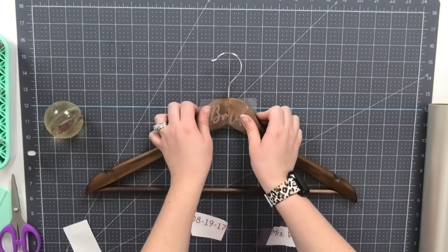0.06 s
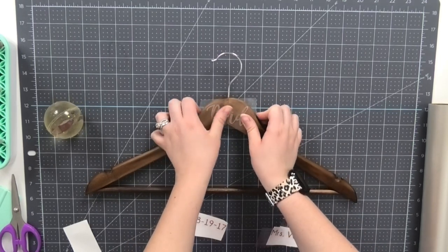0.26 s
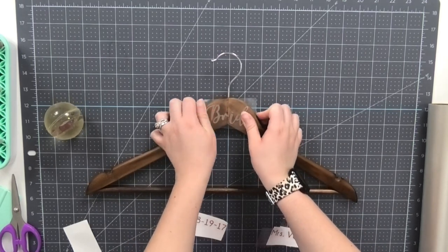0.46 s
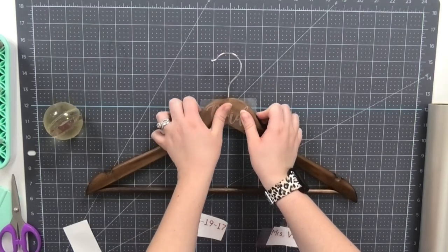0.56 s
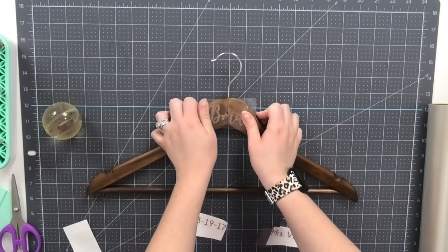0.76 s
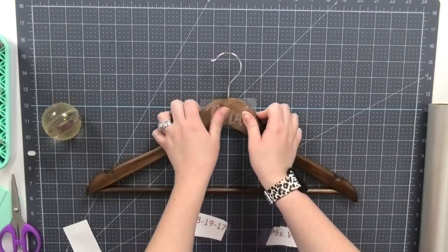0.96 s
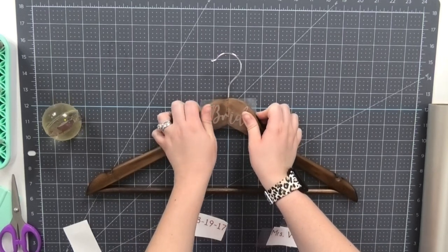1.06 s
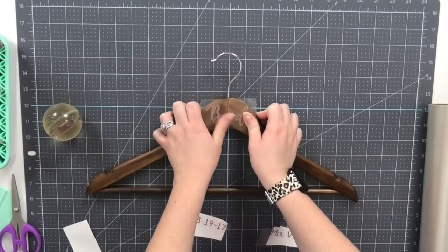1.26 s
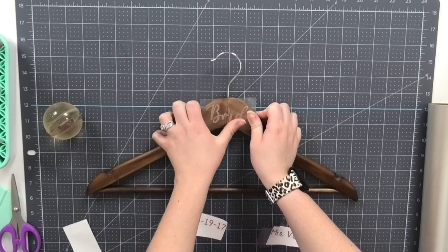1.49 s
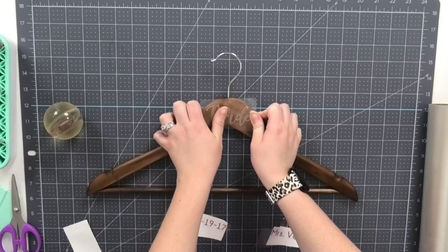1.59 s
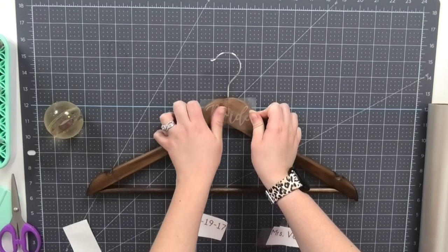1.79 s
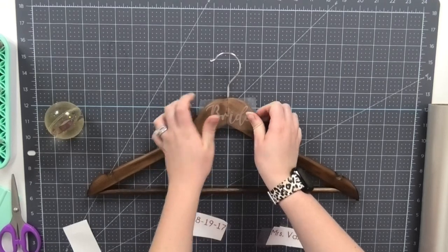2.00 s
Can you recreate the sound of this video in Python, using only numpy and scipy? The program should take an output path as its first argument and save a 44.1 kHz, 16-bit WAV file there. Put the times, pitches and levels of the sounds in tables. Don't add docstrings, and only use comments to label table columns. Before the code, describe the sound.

Short rubs and scrapes of skin on film and wood, a sharp snap early, low thumps near 0.4 and 1 second, then busier crackling strokes; quiet indoor room, close mono microphone, soft hiss and low rumble.

```python
import sys
import numpy as np
from scipy import signal
from scipy.fft import rfft, irfft
from scipy.io import wavfile
from scipy.ndimage import uniform_filter1d

SR = 44100
rng = np.random.default_rng(int(sys.argv[2]) if len(sys.argv) > 2 else 0)


def transcribe(u):
    v = np.clip(np.atleast_2d(u).T, -1, 1)
    q = np.round(v * 32767).astype(np.int16)
    wavfile.write(sys.argv[1], SR, q)


def invert_db(level):
    return 10 ** (np.asarray(level, dtype=float) / 20)


N = 89964
T = np.arange(N) / SR


def level(x, db):
    return x * invert_db(db) / np.sqrt(np.mean(x ** 2))


def band(x, hz, width_hz):
    return signal.lfilter(*signal.iirpeak(hz, hz / width_hz, fs=SR), x)


def ring(x, modes, sense=-1):
    out = 0
    for k, (hz, db, t60_s) in enumerate(modes):
        pole = np.exp(2j * np.pi * hz / SR - np.log(1000) / (t60_s * SR))
        out = out + sense ** k * invert_db(db) * signal.lfilter([1], [1, -pole], x).imag
    return out


def soften(force, push_s):
    push = np.hanning(int(push_s * SR))
    return np.convolve(force, push / push.sum())[:N]


def walk(rate_hz):
    hold = int(SR / rate_hz)
    steps = np.repeat(rng.standard_normal(N // hold + 1), hold)
    return 1.14 * uniform_filter1d(uniform_filter1d(steps, hold), hold)[:N]


def grit(rough_db, flicker_db, rate_hz):
    slip_size = np.minimum(rng.exponential(size=N), 4)
    patches = np.clip(walk(rate_hz), -2, 2)
    return level(rng.standard_normal(N) * invert_db(rough_db * slip_size + flicker_db * patches), 0)


# (frequency [Hz], level [dB per Hz])
ROOM = [(70, -19.5), (150, -21), (400, -19), (1000, -27), (2300, -31), (5400, -35.5), (7000, -40.5),
        (15500, -41)]
ROOM_DB = -55.5
RUMBLE_HZ, RUMBLE_WIDTH_HZ, RUMBLE_DB = 25.2, 16.4, -37.5


def room():
    hz = np.fft.rfftfreq(N, 1 / SR) + 1
    room_hz, room_db = np.array(ROOM).T
    shape = invert_db(np.interp(np.log(hz), np.log(room_hz), room_db)) * (hz > 50)
    hiss = irfft(rfft(rng.standard_normal(N)) * shape, N)
    tremble = band(rng.standard_normal(N), 28.8, 43)
    for _ in range(2):
        tremble = band(tremble, RUMBLE_HZ, RUMBLE_WIDTH_HZ)
    return level(hiss, ROOM_DB) + level(tremble, RUMBLE_DB)


# (time [s], level [dB], stand sway [dB])
THUMPS = [(0, -31, -30.5), (.3665, -5.5, -23), (.382, -17, -40), (0.7065, -15, -29.5), (0.749, -44, -30),
          (1.0178, -7, -24.5), (1.0335, -24, -40), (1.463, -28.5, -39), (1.556, -24, -34),
          (1.591, -40, -32), (1.719, -48, -30), (1.8135, -21.5, -33), (1.887, -31, -30), (1.981, -29, -45),
          (1.9925, -24, -41.5)]
# (frequency [Hz], level [dB], t60 [s])
TABLE = [(87.2, -17.5, 0.23), (131.6, -7.5, 0.23), (180, -1, 0.07), (256, 0.5, 0.14), (271.8, -5, 0.14),
         (356.4, -8, 0.05)]
# (frequency [Hz], level [dB], t60 [s])
SWAY = [(21.67, -0.5, 0.67), (35.4, -2, 0.38), (47.4, -13.5, 0.1)]
PUSH_S, SWAY_LAG_S, SWAY_PUSH_S = 0.0051, 0.02, 0.018


def thumps():
    force, nudge = np.zeros(N), np.zeros(N)
    for s, db, sway_db in THUMPS:
        force[int(s * SR)] += invert_db(db)
        nudge[int((s + SWAY_LAG_S) * SR)] += invert_db(sway_db)
    top = band(ring(soften(force, PUSH_S), TABLE, sense=1), 154, 270)
    top = band(top, 200, 330)
    acceleration = np.gradient(top) * SR / (2 * np.pi * 220)
    sway = ring(soften(nudge, SWAY_PUSH_S), SWAY, sense=0.79)
    return invert_db(2) * acceleration + invert_db(5.5) * sway


# (start [s], length [s], top pitch [Hz], pitch sag at the ends [Hz], level [dB])
SQUEAKS = [
    (.054, .096, 6040, 500, -50.5),
    (.14, .04, 5450, 50, -59),
    (.385, .045, 5380, 60, -65),
    (.434, .062, 5510, 180, -54),
    (.565, .03, 1365, 5, -48),
    (.005, .03, 2680, 60, -55),
    (1.961, .018, 1380, 5, -47),
    (2.005, .012, 2200, 40, -48),
]


def squeaks():
    out = 0
    for s, length_s, top_hz, sag_hz, db in SQUEAKS:
        u = np.clip((T - s) / length_s, 0, 1)
        pitch_hz = top_hz - sag_hz * (2 * u - 1) ** 2 + 8 * walk(150)
        swell = invert_db(db + 2.5 + 0.8 * walk(84.7)) * np.sin(np.pi * u) ** 0.5
        out = out + swell * np.sin(2 * np.pi * np.cumsum(pitch_hz) / SR)
    return out


# (time [s], peak level [dB], pitch [Hz], wood knock [dB])
TICKS = [(.084, -43, 3300, -37), (0.179, -34, 3500, -55), (.1885, -10, 12700, -46), (.1894, -18, 7800, -46),
         (0.245, -33, 3060, -36), (.3408, -38, 5300, -28.5), (.366, -43, 3300, -34), (0.46, -32, 3430, -46),
         (.519, -35, 3040, -42), (0.556, -39.5, 3000, -38), (.706, -42, 3230, -51),
         (0.7535, -19.5, 5190, -21.5), (0.894, -36, 2780, -38.5), (1.018, -25, 4150, -36),
         (1.0243, -35, 4550, -45), (1.0335, -36, 2930, -46), (1.1865, -39, 3300, -32.5),
         (1.2015, -38, 3300, -51), (1.347, -36, 2650, -45), (1.452, -36, 3300, -30.5),
         (1.5543, -32, 3300, -39.5), (1.588, -17, 4950, -47), (1.606, -37, 3500, -38),
         (1.642, -30.5, 3060, -40), (1.6775, -36, 3400, -52), (1.814, -28.5, 3300, -33.5),
         (1.8884, -41, 3000, -43), (1.965, -37.5, 3300, -42), (1.9805, -32, 2800, -45),
         (1.994, -25, 2500, -38)]
# (time [s], peak level [dB], pitch [Hz], wood knock [dB])
SNAPS = [
    (.1883, -21.5, 5020, -58),
    (.367, -29, 12500, -62),
    (1.8145, -33, 7400, -60),
    (1.588, -28, 9000, -60),
    (1.686, -36, 6000, -60),
    (1.0182, -31, 8500, -58),
]
# (time [s], peak level [dB], pitch [Hz], wood knock [dB])
MORE_TICKS = [(1.0179, -33, 13500, -60), (1.0248, -41, 7600, -60), (1.2957, -41, 3150, -52),
              (1.2992, -38, 3300, -52), (1.309, -40, 8300, -60), (1.4115, -40, 3130, -50),
              (1.488, -41, 3400, -50), (1.565, -39, 3200, -55), (1.5765, -36, 3000, -55),
              (1.597, -37, 5000, -60), (1.62, -41, 4500, -55), (1.6845, -34, 3070, -50),
              (1.706, -37, 3300, -52), (1.716, -37, 3100, -55), (1.728, -40, 3300, -55),
              (1.9612, -41, 2690, -55), (2.018, -36, 2500, -55), (2.028, -39, 2500, -55),
              (2.033, -41, 5200, -60), (.473, -38, 3400, -48), (.495, -40, 3300, -50),
              (.6328, -41, 3010, -50), (1.216, -42, 3300, -55), (.7635, -34, 3300, -45),
              (1.5905, -30, 4300, -55), (1.0198, -32, 3000, -48)]
# (frequency [Hz], level [dB], t60 [s])
WOOD = [(401.4, 0, 0.044), (457.5, -0.5, 0.066), (542, -5.5, 0.041), (742, -8.5, 0.064),
        (935, -13.5, 0.034), (1101, -17, 0.058), (1365, -11, 0.046), (1776, -33, 0.036), (2520, -20, 0.012),
        (2967, -13, 0.023), (3310, -8, 0.013)]
TICK_CYCLES, TICK_WIDE_DB, TICK_TAIL_DB, TICK_TAIL_S = 9.1, 2, -16, 0.0028
KNOCK_LAG_S, KNOCK_PUSH_S = 0.00243, 0.0016


def ticks(rows):
    size = 2000
    out, force, age_s = np.zeros(N + size), np.zeros(N), np.arange(size) / SR
    for (s, db, hz, knock_db), noise in zip(rows, rng.standard_normal((len(rows), size))):
        burst = (0.4 + noise) * np.exp(-age_s / 0.0003)
        near = band(band(burst, hz, 2 * hz / TICK_CYCLES), hz, 0.7 * hz)
        crackle = noise[::-1] * np.exp(-age_s / TICK_TAIL_S)
        tail = band(band(crackle, hz, 1.34 * hz), hz, 1.34 * hz)
        wide = band(band(crackle, 2600, 3540), 2400, 5500)
        own = near / abs(near).max() + invert_db(TICK_TAIL_DB) * tail
        i = int(s * SR)
        out[i:i + size] += invert_db(db) * own + invert_db(knock_db + TICK_WIDE_DB) * wide
        force[i] += invert_db(knock_db)
    late = soften(np.roll(force, int(KNOCK_LAG_S * SR)), KNOCK_PUSH_S)
    return out[:N] + invert_db(3) * ring(late, WOOD[:4]) + invert_db(1.0) * ring(force, WOOD[4:])


# (start [s], length [s], centre [Hz], width [Hz], level [dB])
CHATTERS = [
    (0, .14, 4900, 160, -61),
    (.9, .11, 5300, 450, -63),
    (.87, .09, 2700, 500, -58),
    (1.08, .1, 5200, 350, -61),
    (1.995, .045, 2450, 800, -47),
    (1.562, .04, 3200, 1500, -49),
    (1.68, .05, 3000, 900, -50),
    (1.3, .025, 8300, 1200, -57),
    (1.6, .022, 1300, 600, -48),
    (1.225, .1, 2800, 600, -56),
]
# (start [s], length [s], centre [Hz], width [Hz],
# level [dB])
MORE_CHATTERS = [(1.588, .055, 5000, 2500, -52), (1.642, .04, 3800, 3000, -56), (1.7, .045, 3100, 900, -52),
                 (2.003, .035, 4800, 1200, -57), (1.295, .03, 4000, 3000, -53), (.575, .03, 9000, 9000, -58),
                 (.78, .075, 460, 110, -41), (.575, .06, 440, 130, -47), (.37, .05, 430, 150, -43),
                 (.341, .018, 600, 500, -41), (1.03, .04, 800, 500, -50), (1.76, .05, 400, 300, -50),
                 (.756, .02, 950, 90, -46), (.755, .014, 3300, 350, -42), (.085, .02, 1050, 200, -48),
                 (1.188, .04, 800, 250, -50), (1.816, .022, 1370, 80, -49), (1.19, .055, 260, 50, -41),
                 (.29, .05, 2700, 400, -60)]


def chatters(rows):
    out = 0
    for s, length_s, hz, width_hz, db in rows:
        u = np.clip((T - s) / length_s, 0, 1)
        grains = band(band(grit(2.3, 2.1, 200), hz, width_hz), hz, 2 * width_hz)
        out = out + np.sin(np.pi * u) ** 0.58 * level(grains, db)
    return out


# (start [s], length [s], film [dB], wood [dB], table [dB])
SLIDES = [(-.05, 0.16, -74, -48.5, -39), (0.02, 0.28, -54.5, -47.5, -34.5), (.395, .215, -54, -49, -44),
          (0.848, 0.17, -78, -51.5, -52), (1.039, 0.18, -55, -50.5, -40.5),
          (1.228, 0.098, -54.5, -52.5, -49), (1.334, 0.17, -52.5, -50.5, -44),
          (1.88, 0.24, -74, -49, -46.5), (.55, .09, -70, -58, -42), (.63, .08, -75, -66, -44),
          (1.59, .1, -62, -54, -41), (.33, .04, -75, -55, -40), (1.33, .05, -65, -56, -46)]
# (start [s], length [s], film [dB], wood [dB], table [dB])
LANDINGS = [(.3405, .11, -63, -50, -50), (0.467, 0.076, -68, -46.5, -41), (0.632, .032, -48.5, -51, -52),
            (0.753, 0.21, -52, -49, -40), (1.018, .05, -60, -50, -48), (1.181, 0.086, -80, -48, -38.5),
            (1.295, 0.041, -47.5, -52, -43), (1.453, 0.076, -75, -46, -38.5),
            (1.5542, .072, -50, -49.5, -37), (1.6772, 0.09, -50, -46, -40.5),
            (1.8142, 0.077, -55.5, -51, -39.5), (1.887, 0.11, -53.5, -57.5, -43)]
FILM_COLUMN, WOOD_COLUMN, TABLE_COLUMN = 2, 3, 4
SWELL_SHARE, LAND_S, FADE_POWER = 0.31, 0.002, 1.26


def contact(column):
    power = np.zeros(N)
    for row in SLIDES:
        u = np.clip((T - row[0]) / row[1], 0, 1)
        swell = np.clip(np.minimum(u, 1 - u) / SWELL_SHARE, 0, 1)
        power += (invert_db(row[column]) * swell) ** 2
    for row in LANDINGS:
        u = np.clip((T - row[0]) / row[1], 0, 1)
        attack = np.clip((T - row[0]) / LAND_S, 0, 1)
        power += (invert_db(row[column]) * attack * (1 - u ** 2) ** FADE_POWER) ** 2
    return np.sqrt(power)


def shake(force, modes, column):
    return ring(force * contact(column), modes) / ring(force, modes).std()


# (centre [Hz], width [Hz], level [dB])
FILM = [(4970, 500, 1.5), (5450, 340, 1), (6180, 510, 0), (7460, 410, -1), (8480, 350, 1), (10180, 570, -6),
        (13060, 1300, -2.5), (15000, 960, -9), (8900, 19000, -14)]
# (centre [Hz], width [Hz], level [dB])
SCRAPE = [(1204, 1460, 16), (2540, 350, 13), (3300, 285, 4), (4800, 410, -17), (3500, 3600, -8.5)]
SCRAPE_DB = -3
HAND_DAMPING = 0.8


def rubbing():
    film = sum(invert_db(db) * band(grit(3.3, 0.89, 59.3), hz, width_hz) for hz, width_hz, db in FILM)
    skin = grit(2.44, 2.2, 120)
    scrape = sum(invert_db(db) * band(skin, hz, width_hz) for hz, width_hz, db in SCRAPE)
    wood = shake(grit(2.06, 2.2, 50), WOOD, WOOD_COLUMN)
    damped_table = [(hz, db, HAND_DAMPING * t60_s) for hz, db, t60_s in TABLE]
    table = shake(grit(1.75, 2.8, 30.02), damped_table, TABLE_COLUMN)
    hiss = level(film, 0) * contact(FILM_COLUMN)
    return hiss + level(scrape, SCRAPE_DB) * contact(WOOD_COLUMN) + invert_db(2) * wood + table


def scene():
    background = room() + thumps()
    skin = squeaks() + chatters(CHATTERS) + chatters(MORE_CHATTERS)
    snapping = ticks(TICKS + SNAPS) + ticks(MORE_TICKS)
    return (background + skin + snapping + rubbing())[None]


def band_limit(x):
    return signal.sosfilt(signal.butter(12, 17000, fs=SR, output="sos"), x)


def record(dry):
    top_cut = signal.ellip(6, 0.5, 28, 15700, fs=SR, output="sos")
    low_cut = signal.butter(1, 8, "high", fs=SR, output="sos")
    mix = signal.sosfilt(low_cut, signal.sosfilt(top_cut, dry))
    return band_limit(mix)


dry = scene()
out = record(dry)
transcribe(out)
```